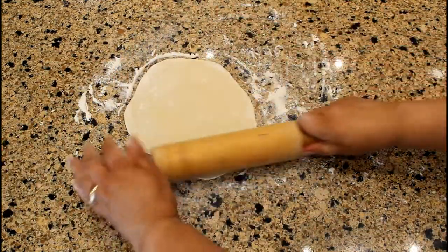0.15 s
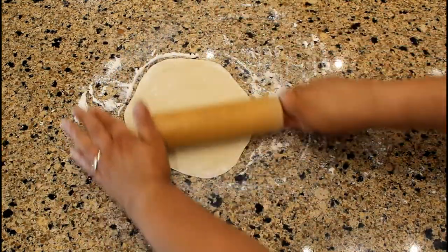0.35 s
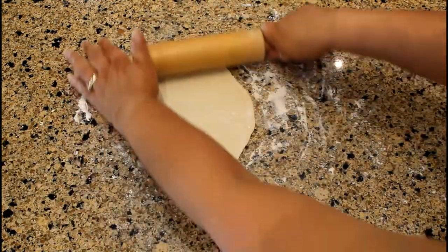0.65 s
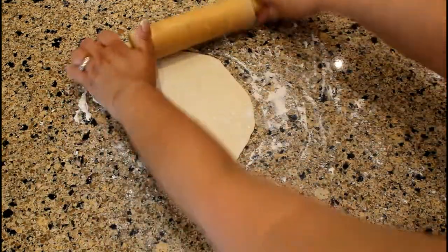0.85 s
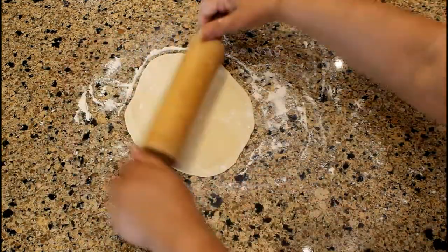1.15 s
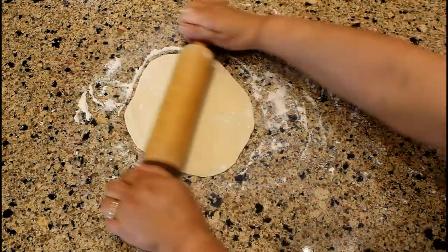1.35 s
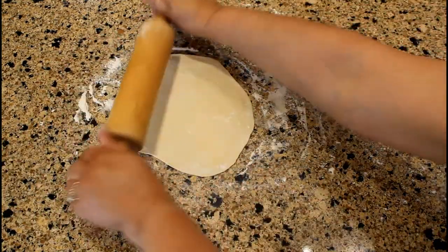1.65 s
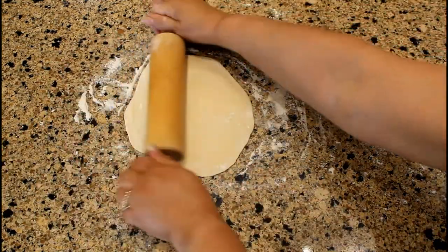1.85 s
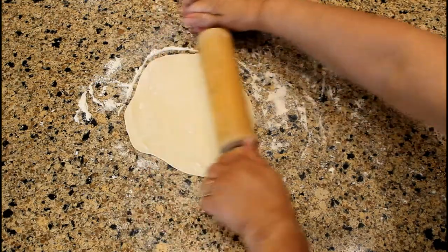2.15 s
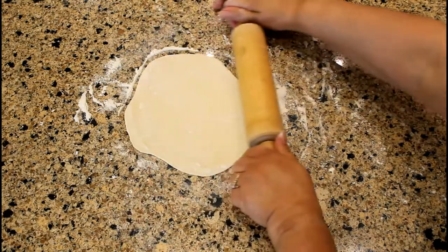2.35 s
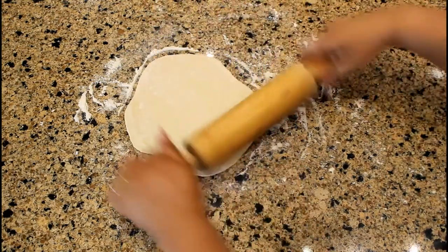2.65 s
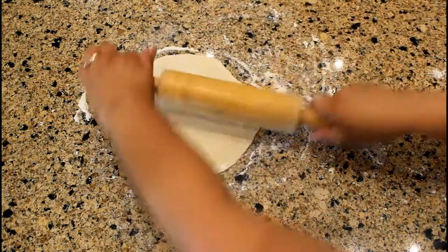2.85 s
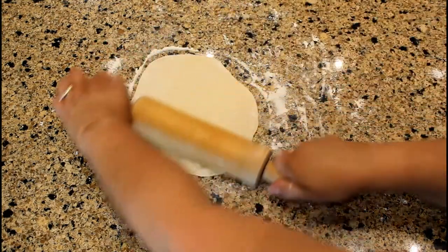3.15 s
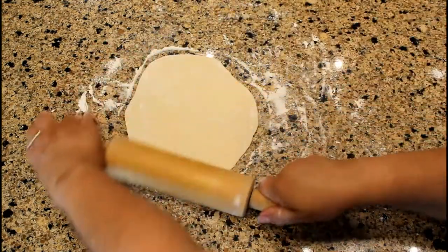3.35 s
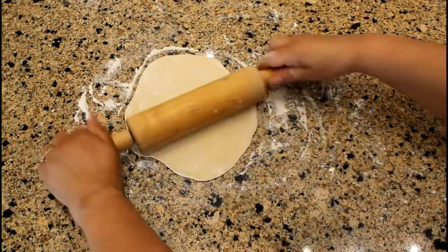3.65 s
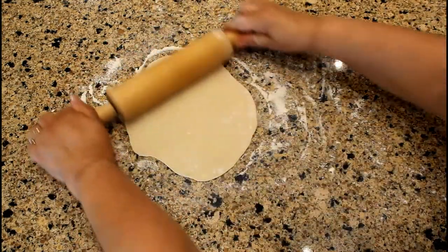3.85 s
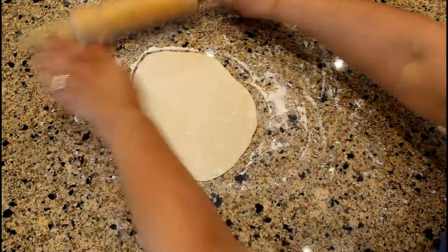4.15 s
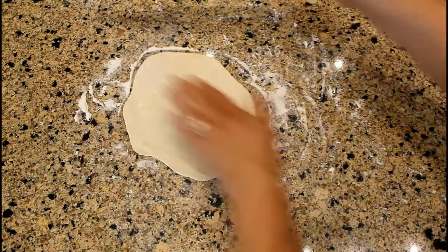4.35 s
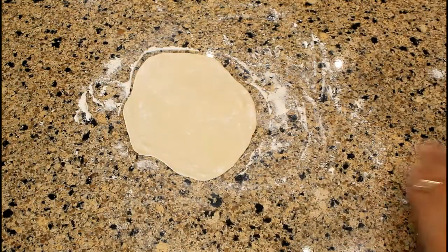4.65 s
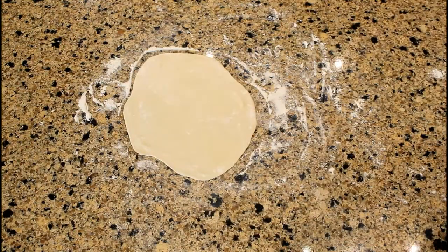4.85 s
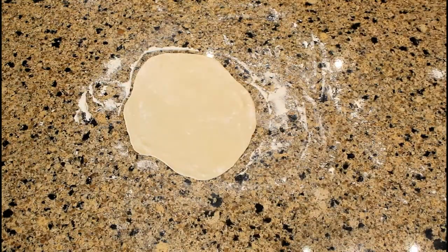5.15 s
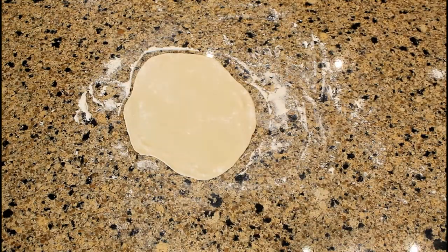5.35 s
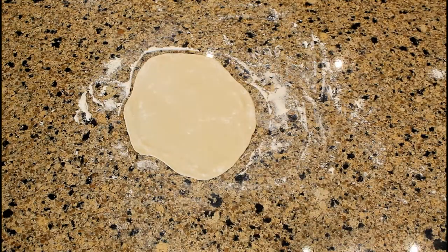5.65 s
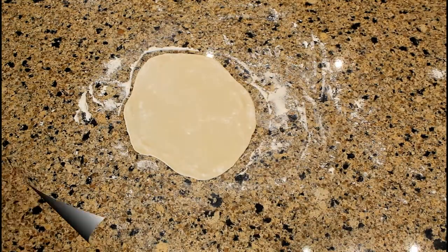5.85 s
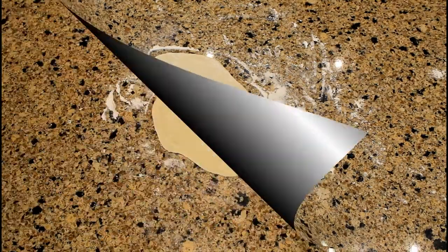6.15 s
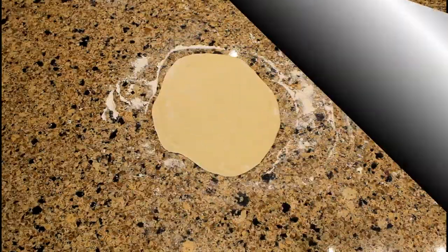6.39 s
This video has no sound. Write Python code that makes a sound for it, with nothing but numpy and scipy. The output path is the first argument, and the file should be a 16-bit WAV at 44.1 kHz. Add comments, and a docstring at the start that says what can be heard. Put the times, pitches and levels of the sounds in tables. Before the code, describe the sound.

Steady low hum and airy rush lie behind irregular wooden knocks as a rolling pin lands on dough over stone. Soft gritty hiss accompanies the strokes, with light rattly ticks from the axle. After a last hollow knock as the pin is put down, only hum, faint low bumps and a small distant tink remain. Most of the hum fades before a short dry scuff. Near-centred, close pickup with lively kitchen reflections.

```python
"""A kitchen hums while a wooden rolling pin works floured dough on a stone counter.
Each time the pin lands, the counter's modes thud under a dull push and the loose barrel clacks on its axle;
between blows the axle ticks lightly and filtered noise and grains make the flour whisper under each stroke.
The pin is put aside with a hollow knock. Soft low bumps follow, swelling sine tones, with a small bright
tink of struck modes among them; most of the hum dies away, and last comes a brief scuff of noisy catches."""
import sys
import numpy as np
from scipy import signal
from scipy.fft import rfft, irfft, next_fast_len
from scipy.io import wavfile
from scipy.ndimage import uniform_filter1d, map_coordinates

SR = 44100
rng = np.random.default_rng(int(sys.argv[2]) if len(sys.argv) > 2 else 0)


def int16_out(signal):
    """Quantize to a 16-bit WAV file."""
    q = np.round(np.clip(np.atleast_2d(signal).T, -1, 1) * 32767)
    wavfile.write(sys.argv[1], SR, q.astype(np.int16))


N = 287526


def amp(db):
    """Decibels to gain."""
    return 10 ** (np.asarray(db) / 20)


def unit(x):
    """Scale to rms 1."""
    return x / np.sqrt(np.mean(x ** 2) + 1e-20)


def burst(x):
    """Scale a short sound to the energy of 20 ms at rms 1."""
    return x / np.sqrt(np.sum(x ** 2) / (.02 * SR) + 1e-20)


def along(points, hz):
    """Read (Hz, value) points on a log axis."""
    f, v = np.transpose(points)
    return np.interp(np.log(hz + 1), np.log(f + 1), v)


def wobble(rate):
    """A smooth random curve, rate knots a second."""
    knots = rng.standard_normal(int(N * rate / SR) + 4)
    return map_coordinates(knots, [np.arange(N) * rate / SR])


def coloured(x, points, size=65536):
    """Causal minimum-phase filter with the gain of (Hz, dB) points."""
    gain = amp(along(points, np.fft.rfftfreq(size, 1 / SR)))
    cepstrum = irfft(np.log(gain))
    # folding the cepstrum forward in time makes the filter answer as early as it can
    cepstrum[1:size // 2] *= 2
    cepstrum[size // 2 + 1:] = 0
    response = irfft(np.exp(rfft(cepstrum)))[:size // 8]
    return signal.fftconvolve(x, response)[:len(x)]


def noise(points):
    """Steady noise of rms 1 with the spectrum of (Hz, dB) points."""
    m = next_fast_len(N)
    spectrum = rfft(rng.standard_normal(m))
    gain = amp(along(points, np.fft.rfftfreq(m, 1 / SR)))
    return unit(irfft(spectrum * gain, m)[:N])


def fade(t60):
    """Half a second of exponential decay, down 60 dB after t60 seconds."""
    return np.exp(-np.log(1000) * np.arange(SR // 2) / SR / t60)


def dying(start_s, db_per_s):
    """A gain that holds, then falls steadily from start_s."""
    return amp(-db_per_s * np.maximum(np.arange(N) / SR - start_s, 0))


def even(x, size):
    """Flatten a half-second noise burst's spectrum over bands of size Hz."""
    spectrum = rfft(x, SR)
    envelope = uniform_filter1d(np.abs(spectrum), size=size)
    return irfft(spectrum / (envelope + 1e-9))[:SR // 2]


def ring(modes, scatter_db, blur):
    """Struck modes at fresh random strengths; rattling widens each line by the share blur of its pitch."""
    t, out = np.arange(SR // 2) / SR, 0
    for k, (hz, db, t60) in enumerate(modes):
        steps = np.sqrt(2 * np.pi * blur * hz / SR) * rng.standard_normal(len(t))
        drift = uniform_filter1d(np.cumsum(steps), size=48)
        strength = (-1) ** k * amp(db + scatter_db * rng.normal())  # neighbours in opposite phase
        out = out + strength * fade(t60) * np.sin(2 * np.pi * hz * t + drift)
    return burst(out)


def nearest(modes, hz):
    """The mode closest in pitch to hz."""
    return min(modes, key=lambda mode: abs(mode[0] - hz))


def standing_out(modes, favoured, blur):
    """The modes picked by (Hz, dB) pairs, each rung at its own level."""
    return sum(amp(db) * ring([nearest(modes, hz)], scatter_db=0, blur=blur) for hz, db in favoured)


# The dry colour of one hard contact. Each row: frequency in Hz, relative level in dB.
CONTACT_COLOUR = [(200, -57), (600, 5.5), (1500, -0.5), (3000, 3), (6000, -0.5), (9500, -7.5), (12000, -11),
                  (15000, -19.5)]


def crack(t60):
    """A sharp contact: its first touch, then noisy chatter that decays over t60 seconds."""
    chatter = fade(t60) * rng.standard_normal(SR // 2)
    chatter[0] += 4.5  # the first touch
    return burst(coloured(even(chatter, size=250), CONTACT_COLOUR))


# Echoes off near walls and cupboards. Each row: mean delay in seconds, gain as a plain factor.
WALL_ECHOES = [(.0055, .2), (.0083, .38), (0.0122, .16), (0.0171, .14)]
# How long the kitchen's tail rings. Each row: frequency in Hz, t60 in seconds before its slow build-up.
TAIL_T60 = [(150, 0.34), (400, 0.46), (1200, 0.39), (3500, 0.43), (8000, 0.23), (13000, 0.2)]
# The tone of that tail. Each row: frequency in Hz, relative level in dB.
TAIL_COLOUR = [(100, -8.5), (230, -0.5), (370, 3.5), (500, 4), (800, 2.5), (2000, -1.5), (6000, -0.5),
               (13000, -1)]


def kitchen(x, wet_db):
    """The direct sound, echoes off near walls and a diffuse tail whose decay depends on pitch."""
    hz, t, z = signal.stft(rng.standard_normal(SR // 2), SR, nperseg=256)
    decay = np.exp(-np.log(1000) * t / along(TAIL_T60, hz)[:, None])
    tail = signal.istft(z * decay, SR, nperseg=256)[1][:SR // 2]
    # the tail builds up over a moment; its noise spectrum is then flattened
    tail = even(tail * (1 - fade(0.029)), size=60)
    response = amp(wet_db) * coloured(tail / np.linalg.norm(tail), TAIL_COLOUR)
    response[0] += 1  # the direct sound
    for delay, gain in WALL_ECHOES:
        shifted = delay + .00015 * rng.normal()  # the paths differ a little each time
        response[int(shifted * SR)] += gain
    return signal.fftconvolve(x, response)[:SR // 2]


def add(track, s, sound):
    """Mix a sound in at time s."""
    part = track[round(s * SR):][:len(sound)]
    part += sound[:len(part)]


# The low rumble of the air. Each row: frequency in Hz, relative level in dB.
RUMBLE_COLOUR = [(12, -62), (20, -22), (59, -12), (114, -1), (129, -15.5), (145, 3), (167, -8),
                 (221, -10.5), (320, -7.5), (420, -43), (700, -120)]
# The air's broad rush. Each row: frequency in Hz, relative level in dB.
RUSH_COLOUR = [(120, -28.5), (200, -1), (267, -2), (326, -13), (357, -1), (683, -9.5), (912, -14),
               (1260, -17.5), (1660, -22.5), (2090, -23), (2510, -26), (6650, -32.5), (13200, -44),
               (15000, -68)]
# Tones of the fan. Each row: frequency in Hz, level in dB before a shared 2 dB cut and a slight waver.
FAN_TONES = [(176, -51), (356, -56), (395, -57), (441, -55), (524, -59.5)]
RUMBLE_DB, RUSH_DB, DRONE_DB = -46.5, -44, -56  # rms until the fade
MAINS_DB, WHINE_DB = -47.5, -70  # rms until the fade
FADE_START_S, RUMBLE_FADE_DB_PER_S, RUSH_FADE_DB_PER_S = 5.39, 7.5, 5
MAINS_STOP_S, MAINS_FADE_DB_PER_S = 5.4, 34  # the 120 Hz hum and the thin whine sink faster


def hum():
    """Moving air, a mains hum and a whine die away near the end; wavering fan tones hold throughout."""
    t = np.arange(N) / SR
    rumble = amp(RUMBLE_DB) * noise(RUMBLE_COLOUR)
    rush = amp(RUSH_DB) * noise(RUSH_COLOUR)
    # a low room mode
    drone = amp(DRONE_DB) * noise([(55, -60), (76, -10), (86, 31), (94, -22), (120, -60), (400, -120)])
    mains = amp(MAINS_DB) * np.sin(2 * np.pi * 120 * t + 0.11 * wobble(4.75))
    whine = amp(WHINE_DB) * np.sin(2 * np.pi * 2035 * t + 0.57 * wobble(40))
    fan = np.zeros(N)
    for hz, db in FAN_TONES:
        level = amp(db - 2.0 + 1.1 * wobble(9.4))
        fan += level * np.sin(2 * np.pi * hz * t + 0.48 * wobble(10))
    low = (rumble + drone) * dying(FADE_START_S, RUMBLE_FADE_DB_PER_S)
    high = rush * dying(FADE_START_S, RUSH_FADE_DB_PER_S)
    tones = fan + (mains + whine) * dying(MAINS_STOP_S, MAINS_FADE_DB_PER_S)
    return low + high + np.sqrt(2) * tones  # root two turns rms into sine peak


# Soft low bumps. Each row: centre in seconds, frequency in Hz, peak level in dB,
# time in seconds from the centre until the swell is down to 1/e.
LOW_BUMPS = [(4.752, 34.5, -40, 0.12), (5.08, 75.4, -38.5, 0.094), (5.1, 141.5, -38, 0.059),
             (5.368, 74.5, -40, 0.062), (5.456, 101, -29, 0.007), (5.462, 197, -39, 0.0094),
             (5.536, 128, -38, 0.043), (5.6, 84.5, -40, 0.015)]


def low_bumps():
    """Each bump is a low sine of wandering phase under a bell-shaped swell."""
    out, t = np.zeros(N), np.arange(N) / SR
    for s, hz, db, length in LOW_BUMPS:
        swell = amp(db) * np.exp(-((t - s) / length) ** 2)
        out += swell * np.sin(2 * np.pi * hz * (t - s) + wobble(25))
    return out


def bright_tink():
    """A tap on something small and hard, farther off: three high modes and a contact, mostly room."""
    tink = ring([(10170, -3, 0.13), (10560, 1, 0.068), (12550, -6, 0.048)], scatter_db=3, blur=0.0069)
    colour = [(500, -15), (1600, 5.0), (3000, 0.5), (5500, -7.0), (9000, -2.5), (13500, 5), (15000, -8)]
    tap = coloured(crack(t60=0.015), colour)
    out = np.zeros(N)
    add(out, 5.018, kitchen(amp(-54.5) * tink + amp(-47.0) * tap, wet_db=5.5))
    return out


# Catches of a brief scuff. Each row: start in seconds, level in dB before colouring and room.
SCUFF_CATCHES = [(6.208, -53), (6.222, -54.5), (6.238, -50.5), (6.258, -57), (6.273, -61)]


def scuff():
    """A surface catches several times in quick succession, each catch a chattering contact."""
    colour = [(700, -4), (1350, 6.5), (1750, 10.0), (2300, 0.5), (5000, 0.5), (11000, -7.5)]
    out = np.zeros(N)
    for s, db in SCUFF_CATCHES:
        add(out, s, amp(db) * kitchen(coloured(crack(t60=0.043), colour), wet_db=-3.5))
    return out


# Strokes of the pin and palms over the flour. Each row: time of greatest speed in seconds,
# time in seconds from there until the stroke is down 17 dB, level in dB of the bare grains at the peak.
FLOUR_STROKES = [(0.465, 0.092, -53.5), (0.685, 0.29, -58), (0.855, 0.096, -57.5), (1.033, 0.044, -60),
                 (1.187, 0.11, -56.5), (1.53, 0.21, -56), (2.3, 0.92, -63.5), (2.705, 0.14, -57.5),
                 (3.336, 0.4, -61), (3.617, 0.086, -60.5), (4.023, 0.49, -60)]
# The hiss of flour. Each row: frequency in Hz, relative level in dB.
FLOUR_COLOUR = [(1500, -10), (4000, 4.5), (7500, 4.5), (10000, -0.5), (14000, -20)]
# Modes of the wooden pin. Each row: frequency in Hz, relative level in dB, t60 in seconds when ungripped.
PIN_MODES = [(952, 8, 0.06), (1150, 1, 0.0096), (1382, 5, 0.08), (1560, 12, 0.027), (2000, -11, 0.045),
             (2507, 17, 0.068), (3170, -23, 0.049), (3530, -24, 0.19), (4050, -1, 0.043), (4690, 4, 0.11),
             (5410, -43, 0.012), (6710, 12, 0.0083), (8030, -6, 0.026), (8290, 7, 0.0042),
             (9690, -17, 0.02)]
PIN_BLUR = 0.012  # width of the pin's lines, as a share of their pitch
GRAIN_DB, GRAINS_PER_S = -6, 750  # single crushed grains against the whisper
GRIP_DB, GRIP_PER_S = 1.5, 45  # the pressure of the hands wavers: depth, knots a second
BARREL_DB = -11.5  # the pin's ring against the bare grains


def rolling():
    """Flour whispers and crunches under barrel and palms and faintly rings the pin; speed sets the level."""
    t = np.arange(N) / SR
    power = np.zeros(N)
    for s, length, db in FLOUR_STROKES:
        power += (amp(db) * np.exp(-2 * ((t - s) / length) ** 2)) ** 2
    speed = np.sqrt(power)
    crushed = (rng.random(N) < GRAINS_PER_S / SR) * rng.standard_normal(N)
    crunch = amp(GRAIN_DB) * unit(coloured(crushed, FLOUR_COLOUR))
    pressure = amp(GRIP_DB * wobble(GRIP_PER_S))
    grains = pressure * (noise(FLOUR_COLOUR) + crunch)
    barrel = signal.fftconvolve(grains, ring(PIN_MODES, scatter_db=0, blur=PIN_BLUR))[:N]
    return speed * (unit(grains) + amp(BARREL_DB) * unit(barrel))


# Light ticks of the axle. Each row: start in seconds, level in dB before the room,
# frequency in Hz near the pin's mode favoured, t60 in seconds of the rattle before colouring.
LIGHT_TICKS = [(0.357, -52.5, 6650, 0.028), (0.638, -59, 4040, 0.05), (2.238, -57, 2470, 0.052),
               (2.302, -57, 6650, 0.02), (2.4932, -52.5, 5330, 0.02), (2.518, -56, 4040, 0.045),
               (2.73, -50.5, 4040, 0.03), (4.106, -47.5, 4040, 0.0066), (4.125, -54, 6650, 0.02),
               (4.1305, -52, 2470, 0.017), (4.935, -54.5, 1530, 0.05), (4.9516, -57, 3230, 0.06),
               (5.2527, -59.5, 5330, 0.05)]
TICK_TONE_DB = -1.5  # a tick's mode against its rattle


def axle_ticks():
    """Play in the axle: a short rattle, coloured by one of the pin's modes."""
    colour = [(800, -6), (2500, -11), (4800, -5.0), (7000, -6), (12000, -13)]
    out = np.zeros(N)
    for s, db, hz, rattle_s in LIGHT_TICKS:
        rattle = burst(coloured(crack(t60=rattle_s), colour))
        tone = standing_out(PIN_MODES, [(hz, TICK_TONE_DB)], PIN_BLUR)
        add(out, s, amp(db) * kitchen(burst(rattle + tone), wet_db=-6.0))
    return out


# Modes of the counter under the pin. Each row: frequency in Hz, relative level in dB, t60 in seconds.
COUNTER_MODES = [(137, -1, 0.26), (240, 9, 0.055), (283.6, 4.5, 0.13), (356, -7, 0.18), (383.4, -2, 0.12),
                 (464, 2.5, 0.075), (515, 0.5, 0.14), (607, 7.5, 0.065)]
# The dull push of the landing. Each row: frequency in Hz, relative level in dB.
PUSH_COLOUR = [(60, -16.5), (200, -3), (520, -4), (900, -16.5), (3000, -29)]
# High-pass that keeps the thud free of deep bass. Each row: frequency in Hz, gain in dB.
THUD_HIGH_PASS = [(30, -32), (80, -18), (150, -6), (220, 0)]
COUNTER_BLUR = 0.008  # width of the counter's lines, as a share of their pitch
PUSH_DB = -1  # the dull push against the counter's ring
LIFT_DB = -0.5  # shared gain of the counter's modes that a landing favours


def thud(db, centre_hz, favoured):
    """A push and the counter's modes, softened by the dough; the landing place makes some modes stand out."""
    shove = even(fade(0.025) * rng.standard_normal(SR // 2), size=50)
    push = burst(coloured(shove, PUSH_COLOUR))
    counter = ring(COUNTER_MODES, scatter_db=0.5, blur=COUNTER_BLUR)
    cushion = [(50, -20), (0.71 * centre_hz, -1), (1.53 * centre_hz, 0), (2 * centre_hz, -7), (4000, -50)]
    body = burst(coloured(counter + amp(PUSH_DB) * push, cushion))
    lifted = amp(LIFT_DB) * standing_out(COUNTER_MODES, favoured, COUNTER_BLUR)
    return coloured(amp(db) * body + lifted, THUD_HIGH_PASS)


# Two faint long rings of the axle. Each row: frequency in Hz, relative level in dB, t60 in seconds.
AXLE_MODES = [(2480, -7, 1), (4060, 4, 0.59)]
# The pin lands or its barrel knocks the axle. Each row: start of the clack in seconds, thud level in dB
# before the high-pass and room, thud centre in Hz, counter modes favoured as (Hz, dB before lift, high-pass
# and room), gains in dB of the hollow, knock, clack and click bands, axle level in dB before the top cut,
# frequency in Hz where that cut begins, share of the pin's ring time that the grip leaves,
# room tail in dB before its colour, pin modes favoured as (Hz, dB before the top cut and the room).
PIN_LANDINGS = [(0.2586, -27.5, 365, [(355, -27.5), (395, -28), (458, -29)],
                -31.5, -34, -38, -34.5, -50, 9800, 0.9, -3, [(910, -39.5), (1130, -41), (2470, -56),
                (4040, -49), (8600, -41)]), (1.364, -26, 292, [(240, -23), (295, -28), (355, -24),
                (395, -28.5)], -24.5, -20.5, -31.5, -28, -47.5, 11500, 0.31, -7, [(1130, -39), (1365, -42),
                (2470, -39), (3230, -39), (4040, -37), (4640, -39), (6650, -34), (8050, -36),
                (9700, -37.5)]), (1.648, -57, 310, [],
                -50, -49, -45.5, -48.5, -65, 12000, 0.3, -8, [(2130, -50), (2470, -45), (4040, -55.5)]),
                (1.9250, -33.5, 403, [(240, -27), (355, -33.5), (395, -31), (458, -26), (515, -35)],
                -24, -16.5, -33.5, -23, -60, 10400, 0.27, -9.5, [(1365, -39), (2470, -33.5), (4640, -34.5),
                (5330, -29.5), (6650, -31), (9700, -33.5)]), (3.0097, -32, 332, [(240, -27.5), (355, -39),
                (515, -35.5)], -25, -28.5, -29.5, -31, -47.5, 9140, 0.82, -3, [(1365, -35.5), (2470, -31),
                (4040, -40), (6650, -33), (8600, -41.5)]), (3.4276, -46, 417, [(458, -41.5)],
                -42, -42, -50, -45, -58, 10000, 0.79, -5, [(2470, -52), (4040, -49), (4640, -54),
                (5330, -45.5), (6650, -45.5)]), (3.761, -28, 327, [(295, -36), (458, -35.5)],
                -26.5, -25, -27.5, -27.5, -47, 11200, 0.8, -4, [(1530, -28), (2470, -35.5), (3585, -38),
                (4640, -39.5), (6650, -40)]), (4.163, -31.5, 454, [(240, -29.5), (515, -29), (615, -35)],
                -17.5, -18.5, -40.5, -48, -70, 9450, 0.77, -4, [(1365, -28), (2130, -44), (3585, -54),
                (4640, -48), (6650, -51.5)])]
AXLE_BLUR = 0.006  # width of the axle's lines, as a share of their pitch
RING_DB = -12  # the pin's ring against the crack
TOP_CUT_DB = 61  # how many dB the clack's filter drops over the octave above top_hz
THUD_WET_DB = -3  # the room's tail on a thud, before its colour


def pin_blows():
    """Dough cushions the landing, so the thud leads; the barrel hits its axle and the contact picks modes."""
    out = np.zeros(N)
    for (s, thud_db, thud_hz, counter_favoured, hollow_db, knock_db, clack_db, click_db,
         axle_db, top_hz, free, room_db, pin_favoured) in PIN_LANDINGS:
        landing = thud(thud_db, thud_hz, counter_favoured)
        add(out, s - .0022, kitchen(landing, wet_db=THUD_WET_DB))
        gripped = [(hz, db, free * t60) for hz, db, t60 in PIN_MODES]
        wood = crack(t60=0.018) + amp(RING_DB) * ring(gripped, scatter_db=2.5, blur=PIN_BLUR)
        # a harder contact carries the knock further up into the clack and the click
        hardness = [(150, hollow_db - 2.5), (750, hollow_db), (1500, knock_db),
                    (2800, clack_db), (4600, clack_db), (6500, click_db)]
        tones = standing_out(gripped, pin_favoured, PIN_BLUR)
        axle = amp(axle_db) * ring(AXLE_MODES, scatter_db=5, blur=AXLE_BLUR)
        top_cut = [(top_hz, 0), (2 * top_hz, -TOP_CUT_DB)]
        clack = coloured(coloured(wood, hardness) + tones + axle, top_cut)
        add(out, s, kitchen(clack, wet_db=room_db))
    return out


def scene():
    """Everything sits near the middle, the pin a touch to the right."""
    background = hum() + low_bumps() + bright_tink() + scuff()
    pin = rolling() + axle_ticks() + pin_blows()
    return background + pin * amp([[-.2], [.2]])  # dB left, dB right


TOP_HZ = 15200


def record(dry):
    """Cut everything from the band limit upward with a sharp edge."""
    m = next_fast_len(N + SR // 2)
    kept = np.fft.rfftfreq(m, 1 / SR) < TOP_HZ
    return irfft(rfft(dry, m) * kept, m)[:, :N]


dry = scene()
out = record(dry)
int16_out(out)
```